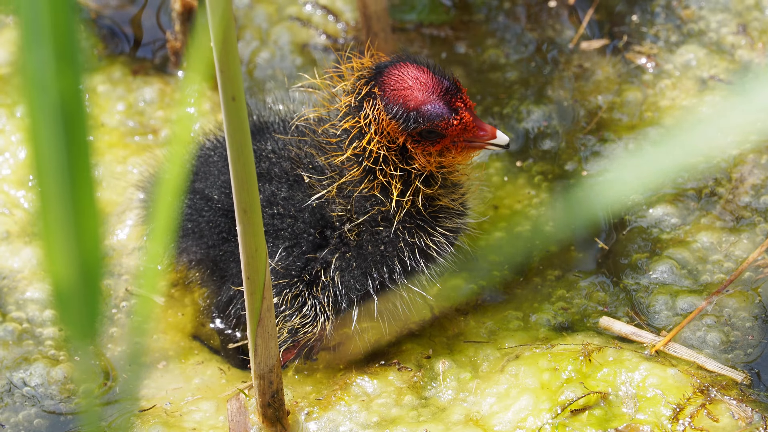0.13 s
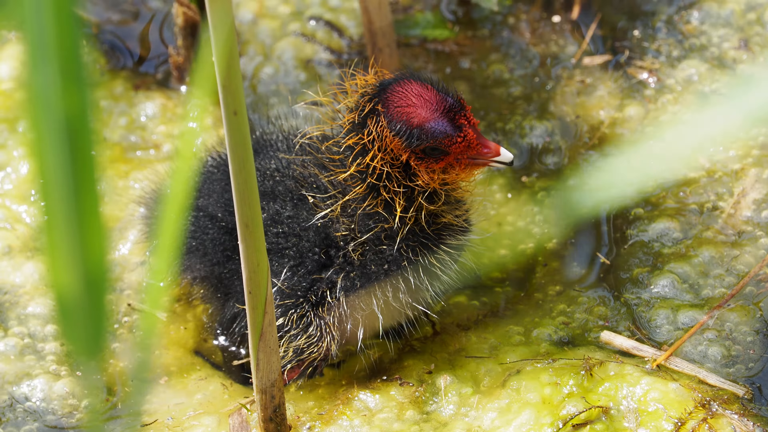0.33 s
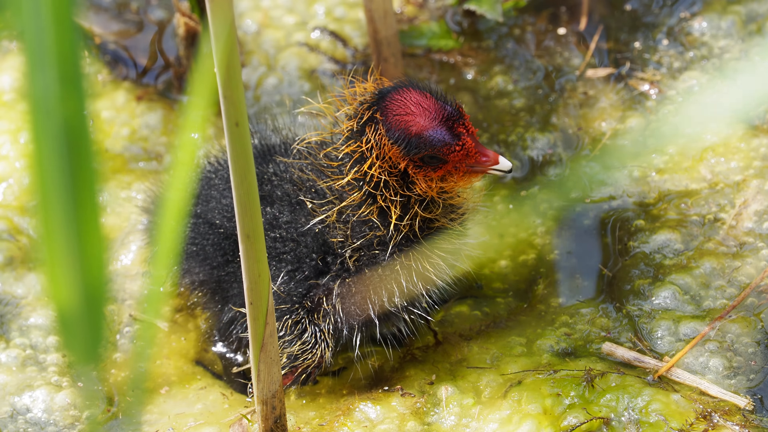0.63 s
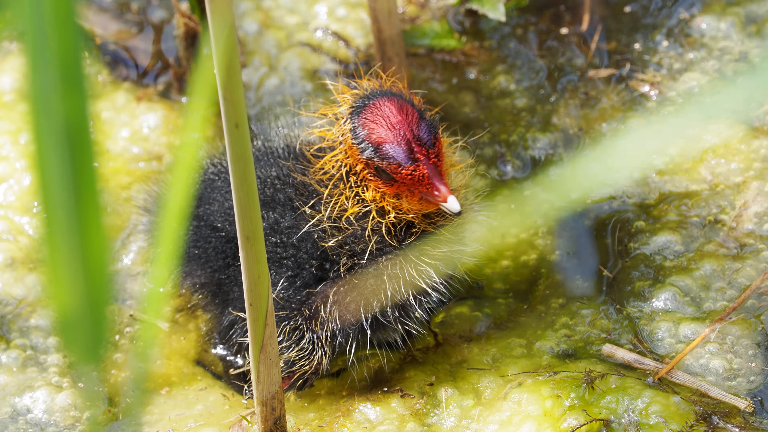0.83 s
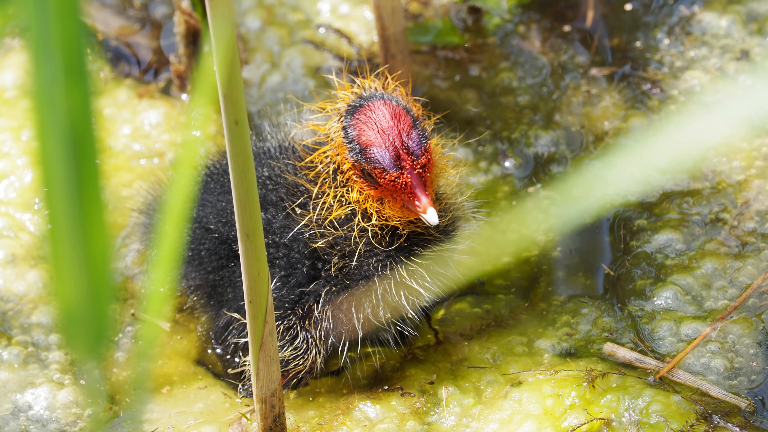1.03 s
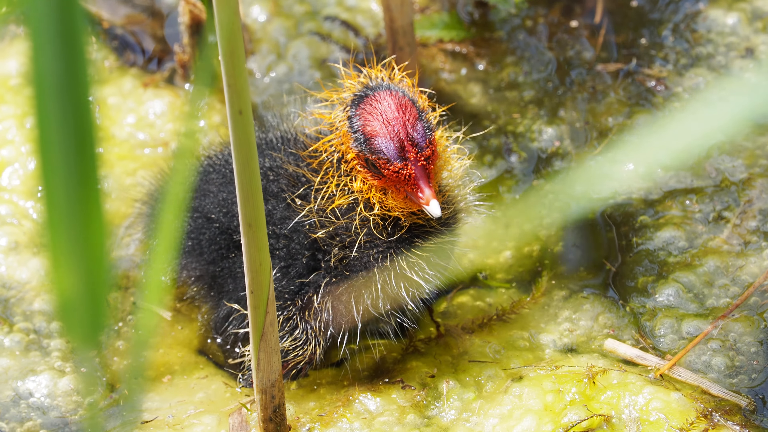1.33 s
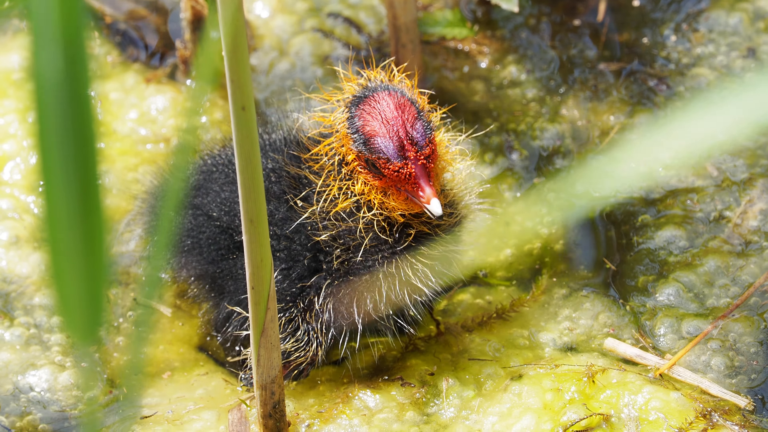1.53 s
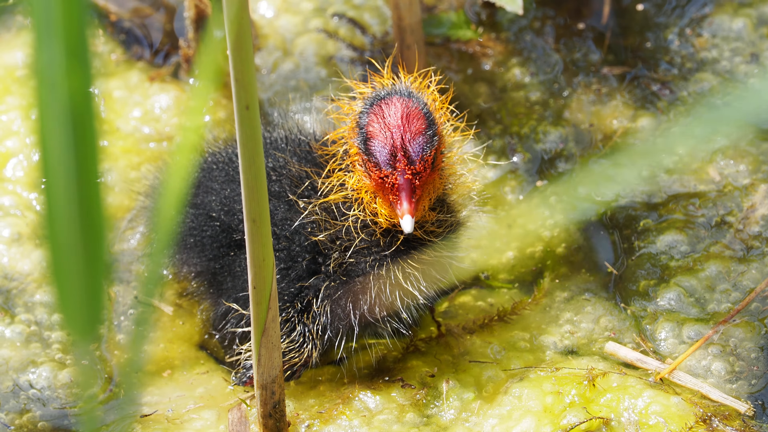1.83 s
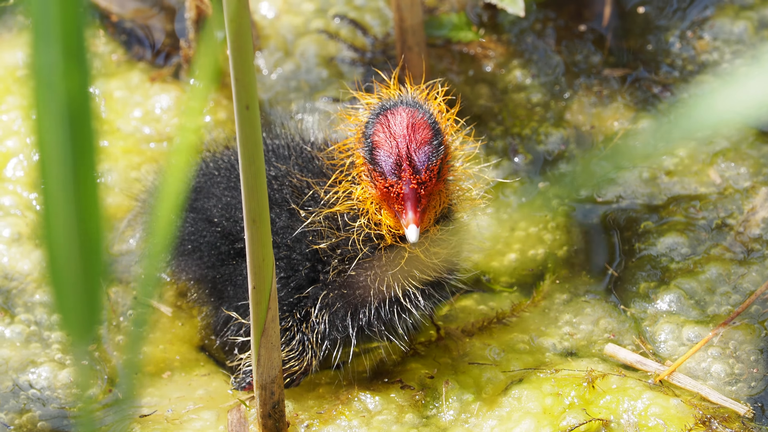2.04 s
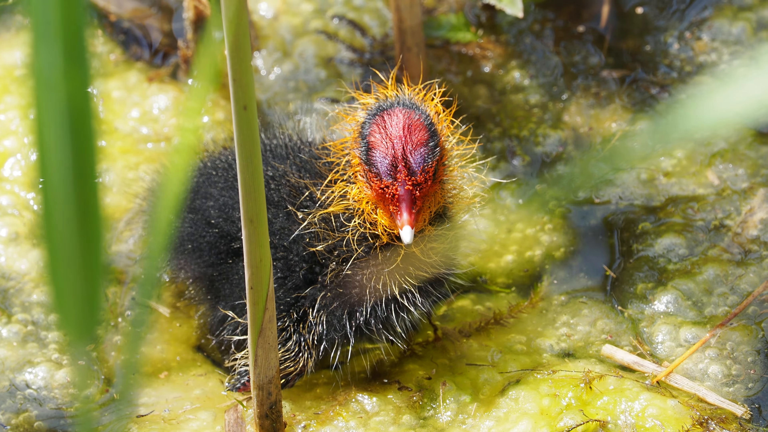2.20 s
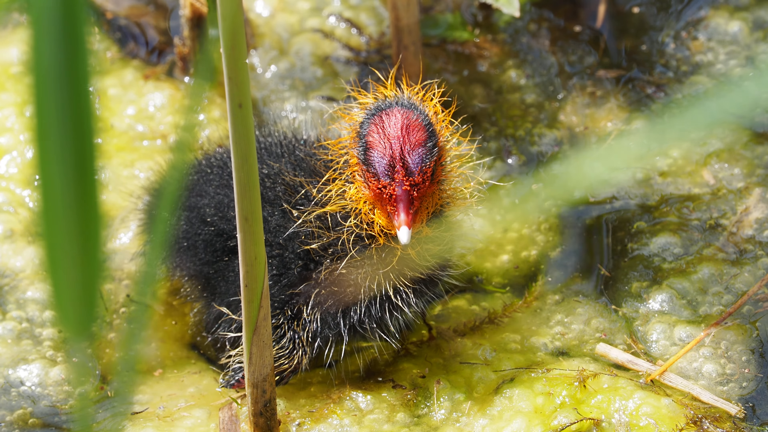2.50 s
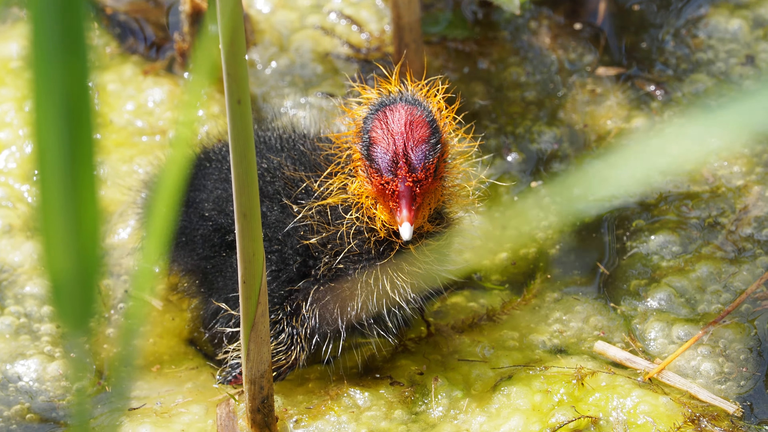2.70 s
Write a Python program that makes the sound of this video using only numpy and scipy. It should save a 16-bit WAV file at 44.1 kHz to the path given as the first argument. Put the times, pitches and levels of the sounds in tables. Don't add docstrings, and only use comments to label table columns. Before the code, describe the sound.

A coot chick close to the microphone gives two falling peeps, then a hoarse rasp and two more peeps; sparrows, a warbler and a distant crow call around the pond over low traffic rumble.

```python
import sys
import numpy as np
from scipy import signal
from scipy.io import wavfile
from scipy.ndimage import uniform_filter1d

SR = 44100
rng = np.random.default_rng(int(sys.argv[2]) if len(sys.argv) > 2 else 0)


def transcribe(signal):
    frames = np.atleast_2d(signal).T
    limited = np.clip(frames, -1, 1)
    pcm = np.round(limited * 32767).astype(np.int16)
    wavfile.write(sys.argv[1], SR, pcm)


def gain_from_db(level_db):
    decades = np.asarray(level_db, float) / 20
    return 10 ** decades


N = 126126
START_S = .156
LEFT_RAD, RIGHT_RAD = -.9, 1.4

# frequency in Hz, density in dB per Hz.
RUMBLE_SPECTRUM = [(8.8, -39), (15, -7.5), (38, 1), (59, -3), (87, -5.5), (258, -20), (341, -60),
                   (360, -40), (470, -70), (790, -120)]
# frequency in Hz, density in dB per Hz.
HISS_SPECTRUM = [(200, -37), (340, -3.5), (891, -1.5), (2970, -13), (4440, -15), (5700, -20.5),
                 (6900, -25.5), (8170, -18.5), (11400, -24), (15800, -23)]
# frequency in Hz, likeness from 0 to 1.
LIKENESS = [(30, 1), (150, 1), (300, 0.8), (1200, 0.7), (2500, 0.011), (8000, 0.0072)]
# time in seconds, level in dB.
ENGINE_PASSING = [
    (.2, 6),
    (1.6, 1.7),
    (1.952, -10.5),
    (2.25, 2.5),
]
# centre in Hz, width in Hz, depth from 0 to 1.
GROUND_DIPS = [(566.6, 71, 0.67), (356, 145, 0.54)]

# start in seconds, length in seconds, pitch in Hz, level in dB.
WHISTLES = [(.156, 0.061, 2400, -56), (0.194, 0.084, 2395, -50), (2.76, 0.094, 4200, -58.5),
            (2.56, 0.076, 6370, -67), (.156, 0.29, 3616, -69), (0.473, 0.2, 2680, -62.5),
            (0.564, 0.067, 4360, -54.5), (0.65, 0.019, 4400, -57), (0.755, 0.065, 4384, -51),
            (0.846, .045, 4340, -62), (.9, 0.042, 4380, -74), (1.206, .14, 2410, -68),
            (1.82, .06, 2880, -66), (2.553, .09, 6970, -62.5), (2.65, 0.085, 4055, -59),
            (.595, 0.034, 3500, -65), (2.279, 0.062, 3810, -58), (2.283, 0.073, 3470, -59),
            (1.35, .03, 3450, -62), (1.38, 0.023, 3320, -57), (1.502, 0.014, 5100, -56),
            (1.757, 0.013, 5010, -47), (1.86, .011, 5100, -58), (1.963, 0.017, 5200, -57),
            (1.8, 0.11, 4150, -60), (2.118, 0.028, 3450, -46.5)]

# start in seconds, length in seconds, pitch in Hz, level in dB.
CAWS = [
    (0.678, 0.42, 208.8, -50.5),
    (1.722, 0.43, 213.5, -48),
    (2.561, 0.37, 206, -51.5),
]
CAW_SHUT = [0, 0, 0.71]
CAW_PITCH = [(0, .96), (.12, 1.0), (.36, .995), (.42, .93), (.69, .915), (.73, .88), (.88, .79), (1, .76)]
# share of the length, level in dB, beak closing from 0 to 1.
CAW_SWELL = [(0, -2.5, 0), (.12, 0.9, 0), (0.359, -0.5, 0.1), (.45, -1.5, 0.3), (.7, -1, 0.4),
             (.8, -1.5, 0.73), (1, -9, 1)]
# centre in Hz, width in Hz, open level in dB, closed level in dB.
THROAT = [(1273, 310, 3, -9.5), (1704, 135, 7.5, -13), (2020, 140, -10, -6), (1490, 296, -1.5, 11.5)]

# length in seconds, start, middle and end pitch in Hz.
DROP = (.018, 3800, 3300, 2750)
LIFT = (.035, 2250, 3000, 3600)
# start
# in seconds, length in seconds, start, middle and end pitch in Hz.
SLURS = [(1.23, .035, 3300, 5200, 7400), (1.25, .025, 3000, 3500, 4000), (1.425, .05, 2700, 3100, 3200),
         (1.52, .025, 3800, 3600, 3400), (1.78, *DROP), (1.81, *DROP), (1.88, *DROP), (1.91, *DROP),
         (1.983, *DROP), (2.183, *LIFT), (2.222, .036, 2750, 3050, 2150), (2.225, .025, 2900, 3300, 3650),
         (2.248, .036, 2500, 3050, 2250), (2.318, *LIFT), (2.358, .028, 2700, 3150, 3600),
         (2.385, .035, 2900, 3050, 2400), (2.465, .04, 3050, 3330, 3350), (2.53, .025, 3700, 3500, 3400),
         (2.825, .035, 3500, 3350, 2900), (2.012, .016, 3700, 3600, 3100), (2.13, .016, 3100, 2800, 2100),
         (1.674, .014, 7100, 6000, 5000), (1.04, .03, 4400, 3900, 3750), (.378, .012, 3650, 3500, 3200)]
SLUR_DB = [-66, -65, -71, -57.5, -58, -60, -53, -57, -54, -57, -56, -57.5, -58, -57, -56, -51, -58.5, -54.5,
           -52.5, -58, -61, -66, -79, -63]

# start in seconds, length in seconds, level in dB, pitch factor, pan in dB.
SPARROWS = [(0.457, 0.082, -49.5, 1.006, 0.5), (1.112, 0.085, -58.5, 0.99, 1),
            (1.291, 0.08, -49.5, 1.017, 1), (1.698, 0.12, -55, 0.95, 3.5), (2.552, .085, -54, .95, 2.7),
            (2.69, .076, -48.5, .985, 1)]
# reach of the upper voice as a factor, lower voice in dB, fade in dB.
CHIRP_MOOD = [(1.05, -7.5, 3.5), (1, 3, -7.5), (0.92, 3.5, 3.5), (0.96, -3.5, -2), (.8, -5, -5.5),
              (0.95, -1.5, 2)]
# share of the length, upper and lower pitch in Hz, upper and lower level in dB.
CHIRP_VOICES = [(0, 3627, 3603, -6.5, -29), (0.251, 3950, 3686, 0.5, -0.5), (0.551, 4750, 3900, 0.5, -26),
                (0.658, 5030, 3998, 1.5, 0.5), (.8, 4750, 4254, -45, 6), (1, 4350, 4270, -35, -9)]

# start in seconds, level in dB,
# lowest frequency in Hz, 60 dB decay in seconds.
REED_TICKS = [(.281, -50, 7000, 0.12), (0.541, -46.5, 7100, 0.14), (0.7111, -35.5, 7100, 0.11),
              (.759, -50, 8100, .03), (.826, -48, 7500, 0.032), (0.905, -49, 9500, 0.056),
              (.96, -50, 7000, .08), (1.078, -46.5, 5000, 0.094), (1.489, -44, 9500, 0.035),
              (1.547, -50, 10000, 0.037), (2.127, -52, 9000, .06), (2.141, -46, 7000, 0.19),
              (2.165, -52, 7400, 0.35), (2.28, -50, 7500, 0.018), (2.73, -49.5, 7100, 0.14),
              (2.842, -42, 10300, 0.2)]

# time in seconds, pitch in Hz.
PEEP_A = [(0.154, 3014), (0.177, 2968), (0.199, 2750), (0.218, 2290), (0.24, 1406)]
PEEP_B = [(0.379, 2957), (0.412, 2900), (0.443, 2760), (0.463, 2536), (0.483, 1480)]
PEEP_C = [(2.0, 2340), (2.009, 2810), (2.055, 3353), (2.06, 3500), (2.098, 3407), (2.121, 2304)]
PEEP_D = [(2.354, 2250), (2.365, 2600), (2.389, 2850), (2.421, 2860), (2.443, 2650), (2.458, 2150),
          (2.469, 1500)]
HOARSE = [(1.542, 2202), (1.554, 2290), (1.636, 2242), (1.676, 1770), (1.69, 1260)]
PEEP_DB = [0.75, -4, -14, -17.5, -17]
HOARSE_DB = [-18, 2.5, -16, -15.5, -23, -26]
# level in dB, swell over its length in dB, pan in dB, brightness in dB.
EFFORT = [
    (-48, 0.5, 1, 1),
    (-46, 1, -1, 3),
    (-44, 2, 1.5, -3.5),
    (-49, -0.4, 0.5, 2),
    (-48.5, -3.5, 2, -0.5),
]
LEAD_RAD = [-1.6, -1.2, 1.5, 1.4, 0]
FUNDAMENTAL_DB = [0.5, -0.5, 2.5, 0.5, 0]
# centre in Hz, width in Hz, level in dB.
RASP = [(3450, 560, 4.5), (4750, 700, 3.5), (6500, 600, -4.5), (8460, 720, -1), (11000, 1500, -11),
        (13200, 1100, -9)]


def rms_one(x):
    return x / np.sqrt(np.mean(x ** 2) + 1e-20)


def at_hz(points, hz):
    table_hz, value = np.transpose(points)
    return np.interp(np.log(hz), np.log(table_hz), value)


def drift(rate):
    r = np.exp(-40 * np.pi * rate / SR)
    slow = signal.lfilter([1], [1, -2 * r, r * r], rng.standard_normal(N // 20 + 2002))[2000:]
    return np.interp(np.arange(N) / 20, np.arange(len(slow)), rms_one(slow))


def phase(hz):
    return 2 * np.pi * np.cumsum(hz) / SR


def peak(x, hz, width_hz):
    r = np.exp(-np.pi * width_hz / SR)
    top = (1 - r * r) / 2
    return signal.lfilter([top, 0, -top], [1, -2 * r * np.cos(2 * np.pi * hz / SR), r * r], x)


def double_peak(x, hz, width_hz):
    return peak(peak(x, hz, width_hz), hz, width_hz)


def band(x, low_hz, high_hz, order):
    return signal.sosfilt(signal.butter(order, [low_hz, high_hz], "band", fs=SR, output="sos"), x)


def span(start, length, edge):
    i = np.arange(int(start * SR), min(int((start + length) * SR), N))
    share = (i / SR - start) / length
    to_edge = np.minimum(share, 1 - share) * length
    return i, share, np.sin(np.pi / 2 * np.clip(to_edge / edge, 0, 1))


def add(out, i, x, pan_db, rad=0.):
    sides = np.array([[.5], [-.5]])
    x = signal.hilbert(x) * np.exp(1j * rad * sides)
    out[:, i] += x.real * gain_from_db(sides * pan_db)


def banded_noise(spectrum, edges, patchy_db):
    out, together = 0, drift(11.0)
    white = rng.standard_normal((2, 2, N + SR // 2))
    for k, (low, high) in enumerate(zip(edges, edges[1:])):
        centre = np.sqrt(low * high)
        mid, side = band(white[k % 2], low, high, 2)[:, -N:]
        alike = np.clip(at_hz(LIKENESS, centre), 0, .96)
        gain = gain_from_db(at_hz(spectrum, centre) + patchy_db * (together + drift(15.3)))
        out = out + gain * (np.sqrt(1 + alike) * mid + np.sqrt(1 - alike) * side * [[1], [-1]])
    return rms_one(out)


def engine():
    hz, width_hz = 52.06, 11.4
    drone = peak(peak(rng.standard_normal(N + SR), hz, width_hz), hz, 2 * width_hz)[SR:]
    driven = rms_one(peak(np.tanh(rms_one(drone)), hz, 29))
    return gain_from_db(-38.5 + np.interp(np.arange(N) / SR, *np.transpose(ENGINE_PASSING))) * driven


def background():
    rumble = gain_from_db(-37.5) * banded_noise(RUMBLE_SPECTRUM, 14 * 2 ** np.arange(0, 4.8, 1 / 3), patchy_db=0.4)
    hiss = gain_from_db(-49) * banded_noise(HISS_SPECTRUM, 370 * 2 ** np.arange(0, 5.6, 1 / 3), patchy_db=0.61)
    bass_rise = np.clip((np.arange(N) / SR - START_S) / 0.032, .3, 1)
    out = bass_rise * (rumble + engine()) + hiss
    for hz, width_hz, depth in GROUND_DIPS:
        out = out - depth * peak(out, hz, width_hz)
    return out


def echoes(x):
    t60_s, alike = .33, .6
    age = np.arange(SR // 2) / SR
    left, right, shared = rng.standard_normal((3, SR // 2))
    tail = np.sqrt(alike) * shared + np.sqrt(1 - alike) * np.array([left, right])
    tail = tail * gain_from_db(-60 * age / t60_s) * (age > .003)
    tail = tail / np.sqrt(np.sum(tail ** 2, axis=1, keepdims=True))
    return signal.fftconvolve(x, tail, axes=1)[:, :N]


def far_whistles():
    out, air, grit = np.zeros((2, N)), drift(18.0), drift(220.0)
    for s, length, hz, db in WHISTLES:
        i, _, gate = span(s, length, min(.02, length / 2))
        waver = .9 * air[::-1][i] + .5 * (hz / 4000) ** 2 * grit[i]
        tone = np.sin(2 * np.pi * hz * i / SR + waver)
        add(out, i, gate * gain_from_db(db + 3 + 2.5 * air[i]) * tone, rng.normal(0, 2), LEFT_RAD)
    return out


def crow():
    out, jitter, noise = np.zeros((2, N)), drift(30.0), rng.standard_normal(N)
    at, swell_db, closing = np.transpose(CAW_SWELL)
    for (s, length, hz, db), shut in zip(CAWS, CAW_SHUT):
        i, share, gate = span(s, length, 0.004)
        pitch = hz * np.interp(share, *np.transpose(CAW_PITCH)) * (1 + .007 * jitter[i])
        cycles = np.cumsum(pitch) / SR
        pulses = rms_one(np.diff(np.floor(cycles), prepend=0))
        source = pulses + .5 * noise[i] * (cycles % 1 < .5)
        shut = np.clip(shut + np.interp(share, at, closing), 0, 1)
        voice = 0
        for k, (f, width, open_db, closed_db) in enumerate(THROAT):
            gain = gain_from_db(open_db + (closed_db - open_db) * shut)
            voice = voice + (-1) ** k * gain * double_peak(source, f, 1.03 * width)
        add(out, i, gate * gain_from_db(db + np.interp(share, at, swell_db)) * rms_one(voice), -1.5, LEFT_RAD)
    return out


def warbler():
    out, grit = np.zeros((2, N)), drift(220.0)
    for (s, length, first, middle, last), db in zip(SLURS, SLUR_DB):
        i, u, gate = span(s, length, 0.00081)
        hz = first * (1 - u) * (1 - 2 * u) + 4 * middle * u * (1 - u) + last * u * (2 * u - 1)
        tone = np.sin(phase(hz) + 0.5 * grit[i])
        add(out, i, gate * gain_from_db(db + 8) * tone, rng.normal(0, 2), RIGHT_RAD)
    return out


def sparrows():
    out, grit = np.zeros((2, N)), drift(175.0)
    at, *columns = np.transpose(CHIRP_VOICES)
    for (s, length, db, scale, pan_db), (reach, mate_db, fade_db) in zip(SPARROWS, CHIRP_MOOD):
        i, share, gate = span(s, length, 0.009)
        up, low, up_db, low_db = [np.interp(share, at, column) for column in columns]
        up = up[0] + reach * (up - up[0])
        db = db + 2 * grit[::-1][i] + fade_db * (2 * share - 1)
        for hz, voice_db in (up, up_db), (low, low_db + mate_db):
            turn = phase(hz * scale) + .45 * grit[i]
            tone = np.sin(turn) + gain_from_db(-21) * np.sin(2 * turn)
            add(out, i, gate * gain_from_db(db + voice_db + 5.0) * tone, pan_db, LEFT_RAD)
    return out


def reed_ticks():
    out = np.zeros((2, N))
    crackle = 1 + rng.exponential(1, N) * (rng.random(N) < .05)
    grains = rng.standard_normal((2, N)) * crackle
    for s, db, low_hz, t60 in REED_TICKS:
        i = np.arange(int(s * SR), min(int((s + t60) * SR), N))
        age = (i - i[0]) / SR
        burst = gain_from_db(db) * grains[:, i] * (gain_from_db(-60 * age / t60) + gain_from_db(-60 * age / .003))
        add(out, i, band(burst, low_hz, 13400, 3), 0)
    return out


def breath_rasp(i, share, wander):
    pulse = 2 + np.sin(2 * np.pi * 190 * i / SR + wander)
    air = rng.standard_normal((2, len(i))) * pulse
    rasp = sum(gain_from_db(db) * double_peak(air, hz, width_hz) for hz, width_hz, db in RASP)
    return np.abs(np.sin(np.pi * share)) ** .5 * gain_from_db(-48.5) * rms_one(rasp)


def chick():
    flutter_db, sag_db, edge_s, glide_s = 2.0, 8, .004, .008
    scatter_rad, rough_rad, crack_s = .3, 1.3, 1.4
    out, sides = np.zeros((2, N)), np.array([[.5], [-.5]])
    wobble, grit = [drift(60.0) for _ in range(6)], drift(150.0)
    calls = [PEEP_A, PEEP_B, PEEP_C, PEEP_D, HOARSE]
    for rows, effort, lead, low_db in zip(calls, EFFORT, LEAD_RAD, FUNDAMENTAL_DB):
        db, swell_db, pan_db, bright_db = effort
        s, hz = np.transpose(rows)
        i, share, gate = span(s[0], s[-1] - s[0], edge_s)
        pitch = uniform_filter1d(np.interp(i / SR, s, hz), int(glide_s * SR), mode="nearest")
        turn, sag = phase(pitch), 1 - pitch / pitch.max()
        hoarse = rows is HOARSE
        cracked = hoarse * np.clip((i / SR - crack_s) / edge_s, 0, 1)
        tone = 0
        for k, (partial_db, w) in enumerate(zip(HOARSE_DB if hoarse else PEEP_DB, wobble), 1):
            level = partial_db + flutter_db * w[i] - (k + 0.5) * sag_db * sag
            level = level + (k > 2) * bright_db + (k == 1) * low_db
            rough = k * cracked * rough_rad / 2 * grit[i]
            spread = (not hoarse) * sides * (2 * scatter_rad * w[::-1][i] + (k == 1) * lead)
            tone = tone + gain_from_db(level) * (k * pitch < 15800) * np.sin(k * turn + rough + spread)
        if hoarse:
            half_pitch = gain_from_db(-19) * np.sin(turn / 2 + 2 * grit[::-1][i])
            tone = tone * gain_from_db(-1.5 * cracked) * (1 + 2 * cracked * half_pitch)
            add(out, i, breath_rasp(i, share, wobble[0][i]), 2)
        swell = gain_from_db(db + swell_db * (2 * share - 2))
        add(out, i, np.sqrt(2) * gate * swell * tone, pan_db, hoarse * LEFT_RAD)
    return out


def scene():
    bed = background()
    slurs = far_whistles() + warbler()
    caws, chirps, near = crow(), sparrows(), chick()
    wet = echoes(gain_from_db(-0.5) * chirps + gain_from_db(-1.5) * caws + gain_from_db(-6) * slurs + gain_from_db(-11) * near)
    return bed + slurs + caws + chirps + wet + reed_ticks() + near


def low_pass(x):
    return signal.sosfilt(signal.butter(12, 15850, fs=SR, output="sos"), x)


def record(dry):
    low_passed = signal.sosfilt(signal.cheby2(14, 50, 16050, fs=SR, output="sos"), dry)
    finished = low_passed * (np.arange(N) >= START_S * SR)
    return low_pass(finished)


dry = scene()
out = record(dry)
transcribe(out)
```